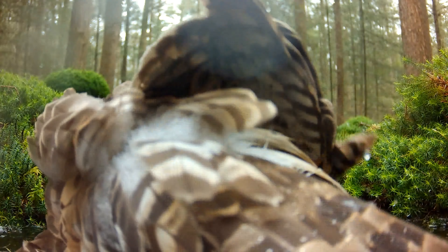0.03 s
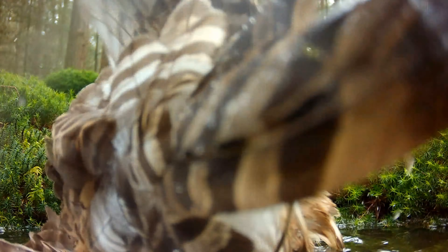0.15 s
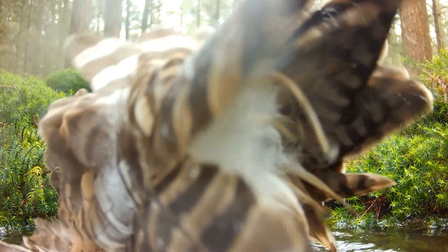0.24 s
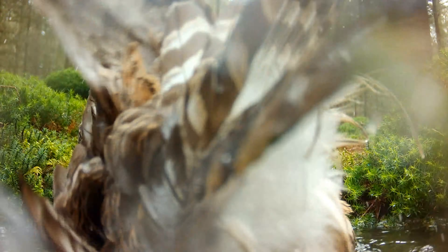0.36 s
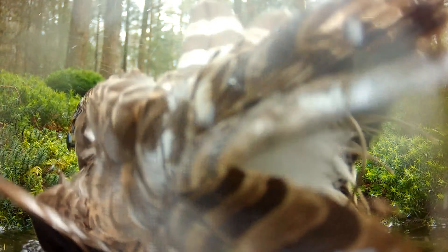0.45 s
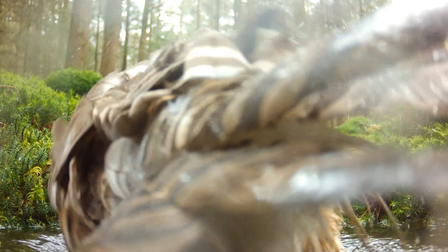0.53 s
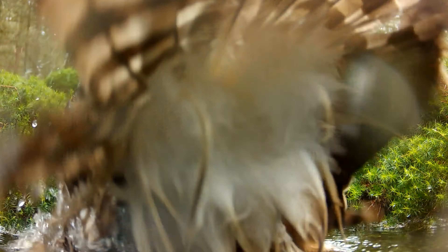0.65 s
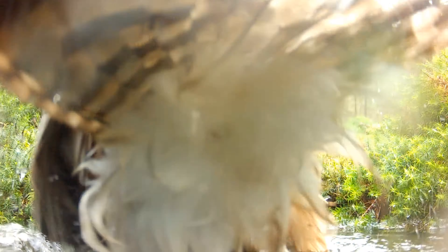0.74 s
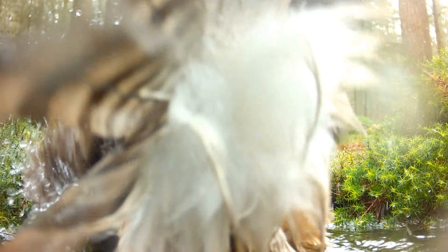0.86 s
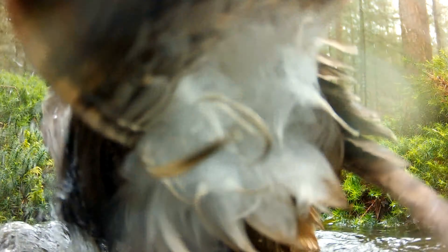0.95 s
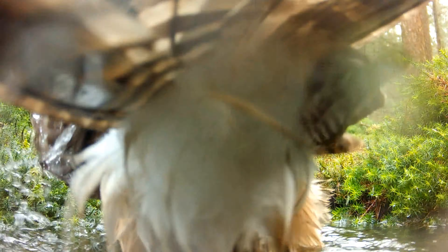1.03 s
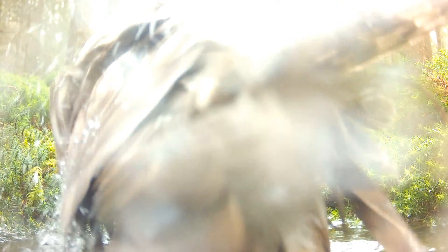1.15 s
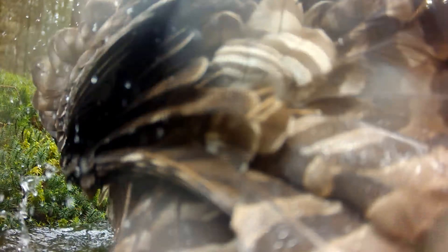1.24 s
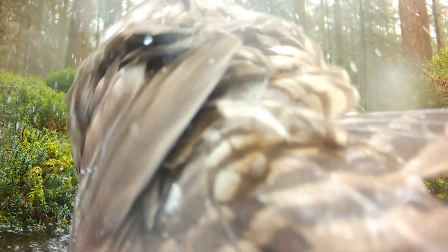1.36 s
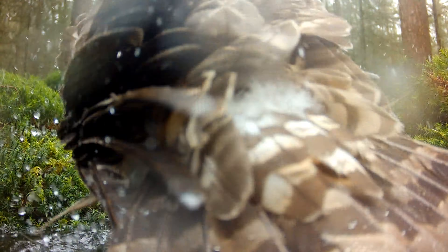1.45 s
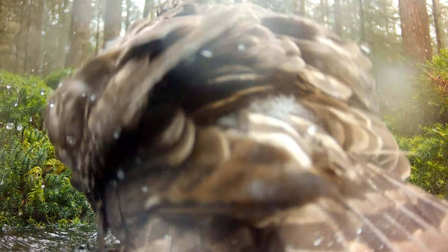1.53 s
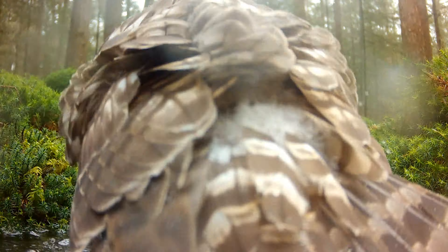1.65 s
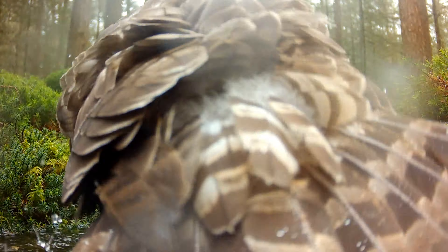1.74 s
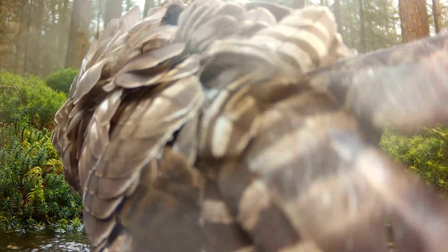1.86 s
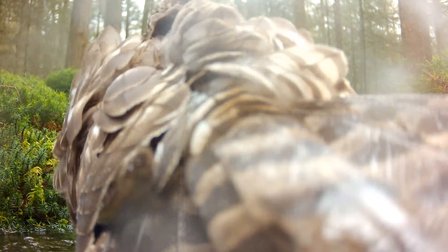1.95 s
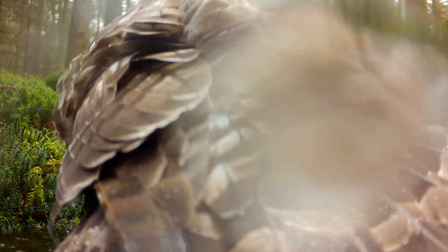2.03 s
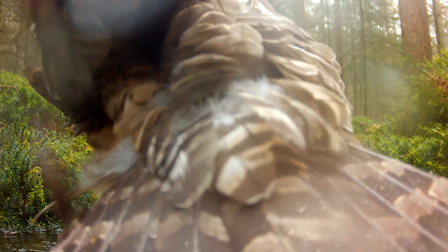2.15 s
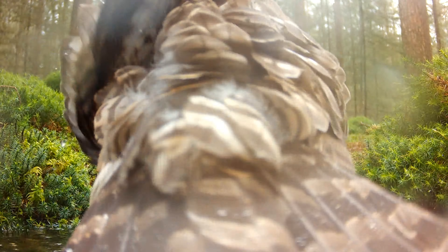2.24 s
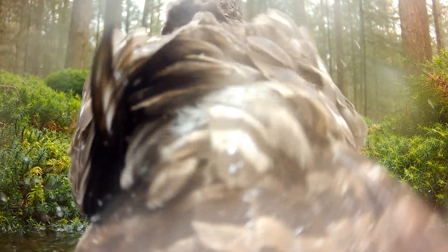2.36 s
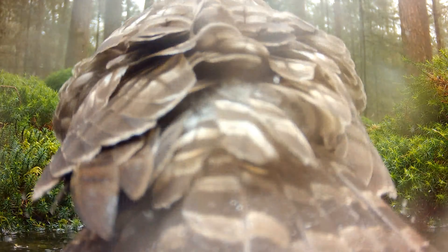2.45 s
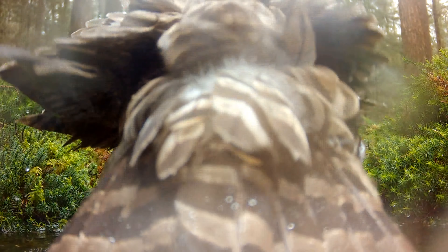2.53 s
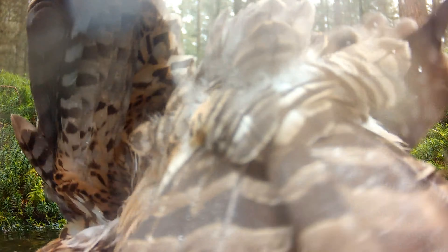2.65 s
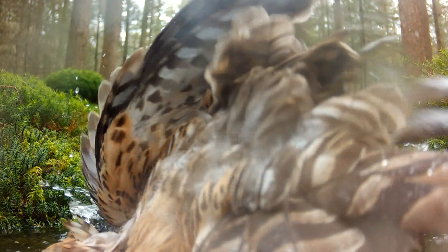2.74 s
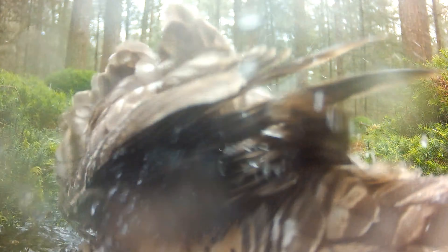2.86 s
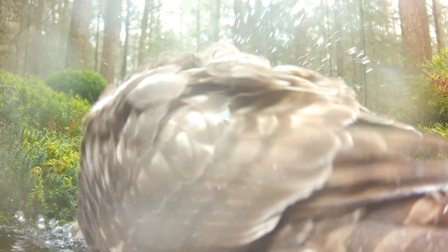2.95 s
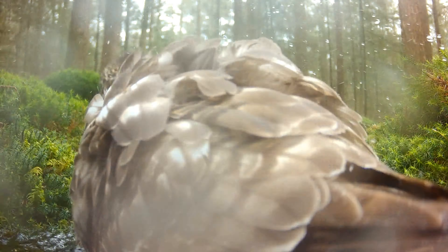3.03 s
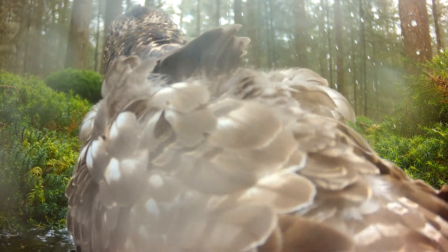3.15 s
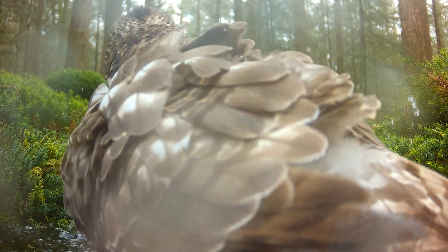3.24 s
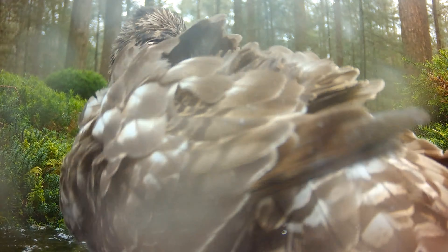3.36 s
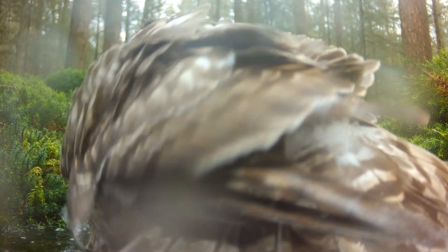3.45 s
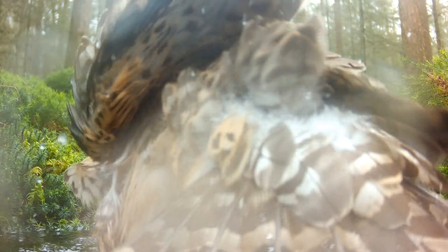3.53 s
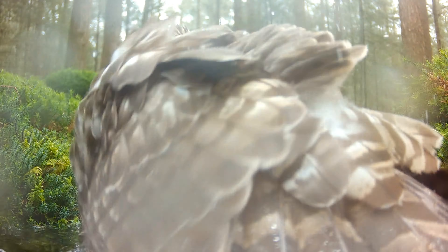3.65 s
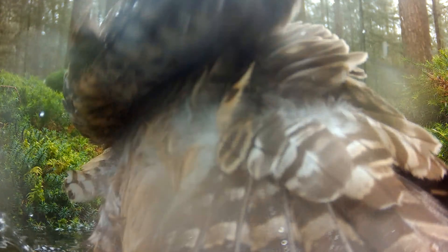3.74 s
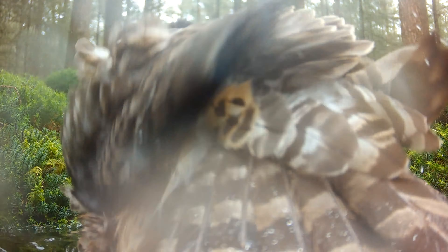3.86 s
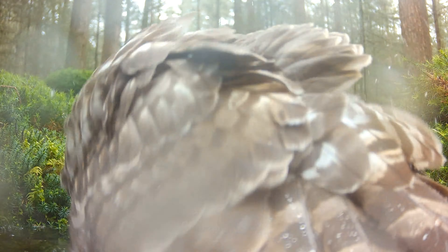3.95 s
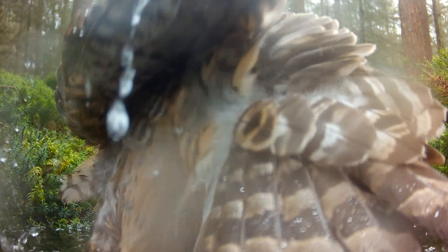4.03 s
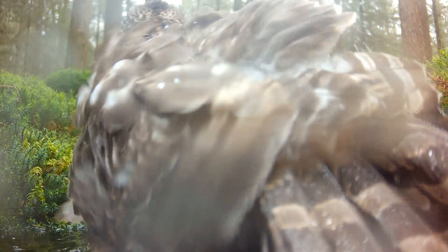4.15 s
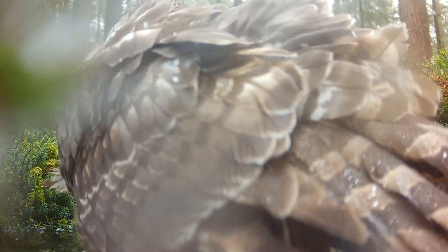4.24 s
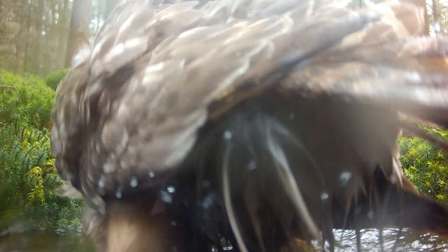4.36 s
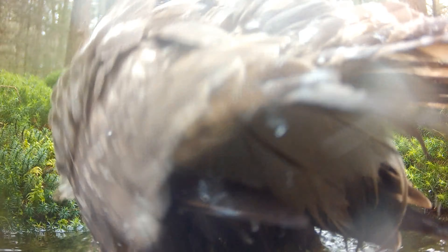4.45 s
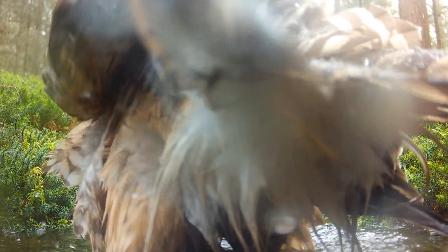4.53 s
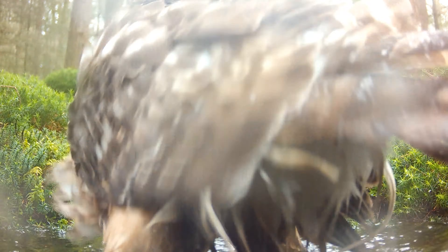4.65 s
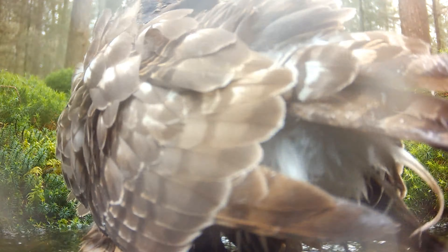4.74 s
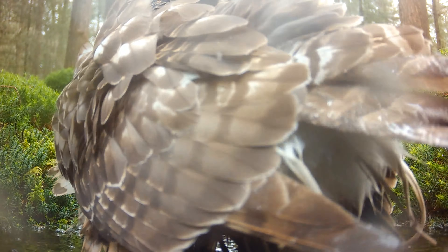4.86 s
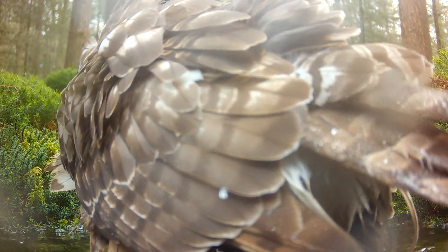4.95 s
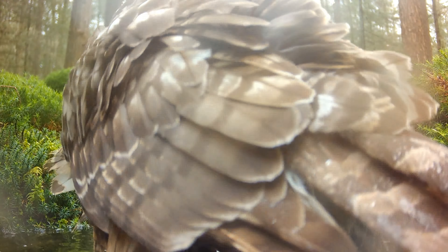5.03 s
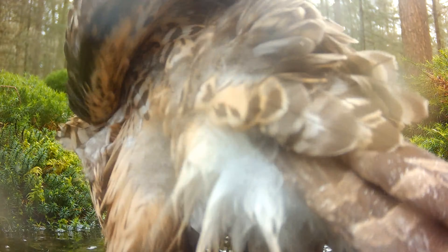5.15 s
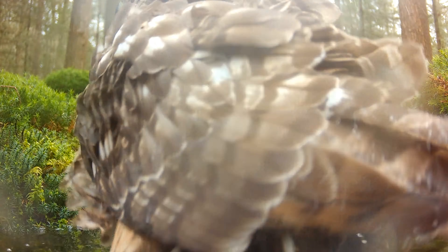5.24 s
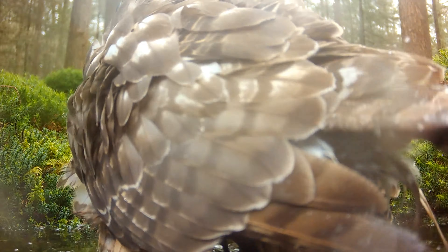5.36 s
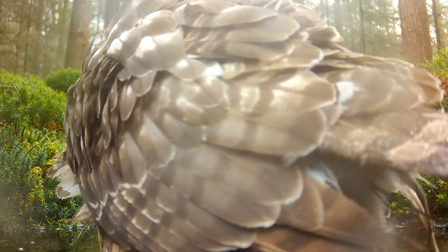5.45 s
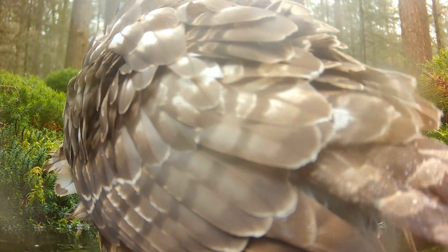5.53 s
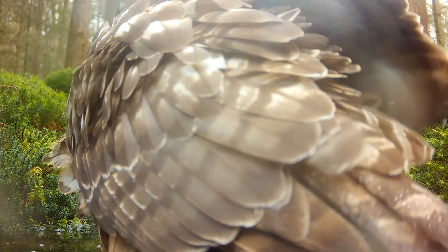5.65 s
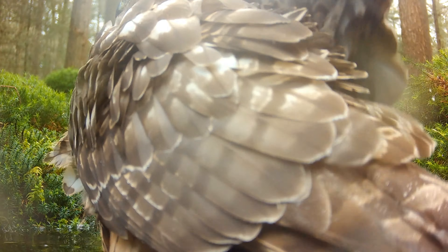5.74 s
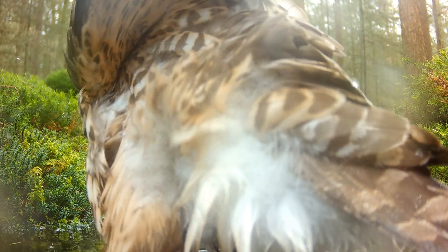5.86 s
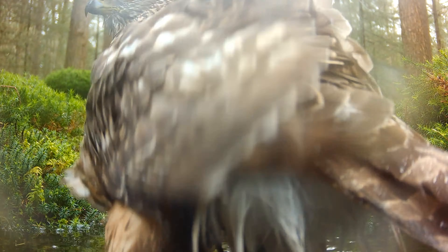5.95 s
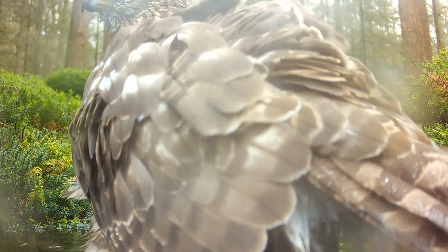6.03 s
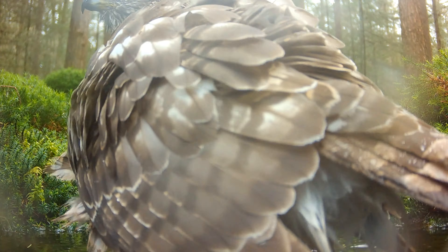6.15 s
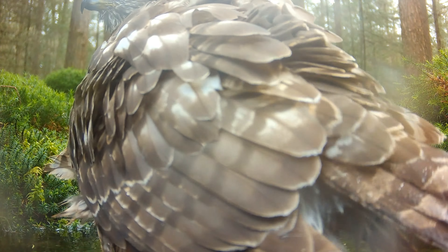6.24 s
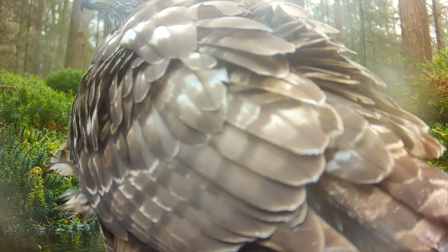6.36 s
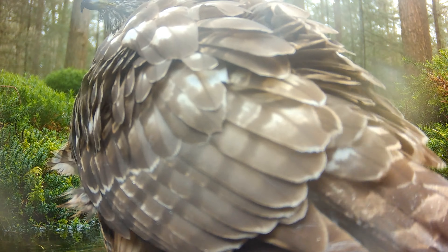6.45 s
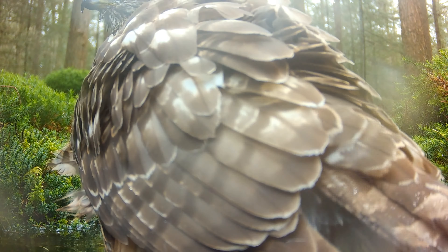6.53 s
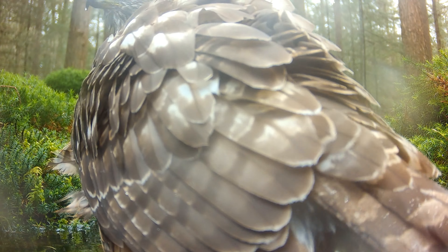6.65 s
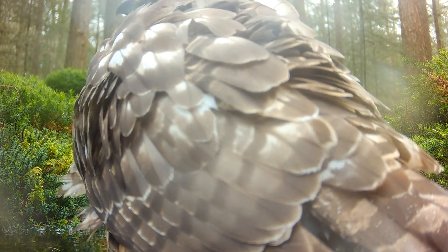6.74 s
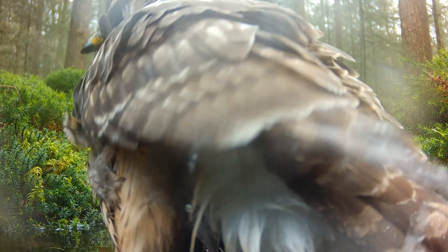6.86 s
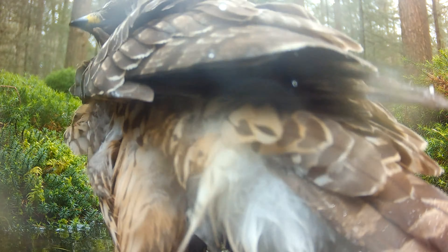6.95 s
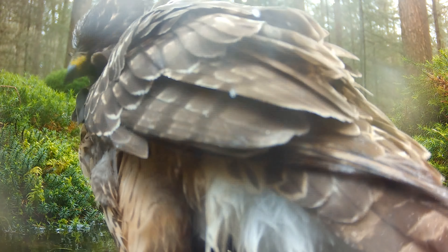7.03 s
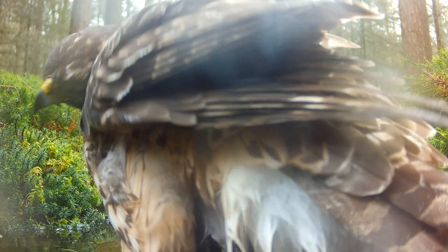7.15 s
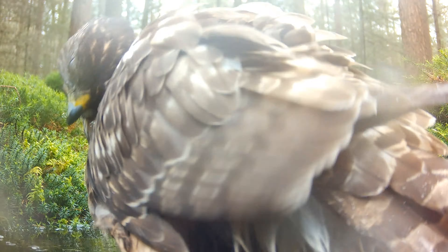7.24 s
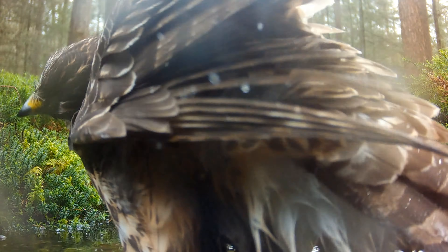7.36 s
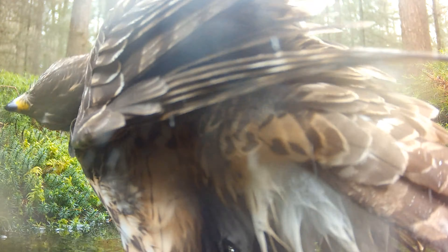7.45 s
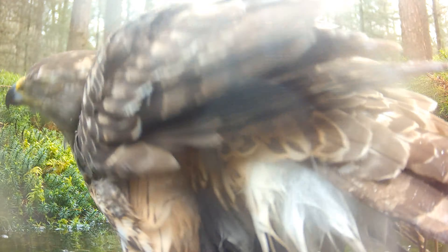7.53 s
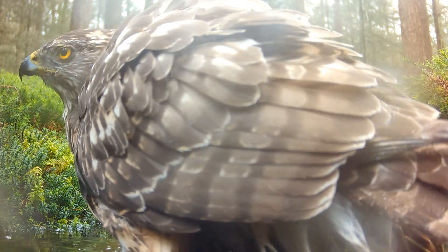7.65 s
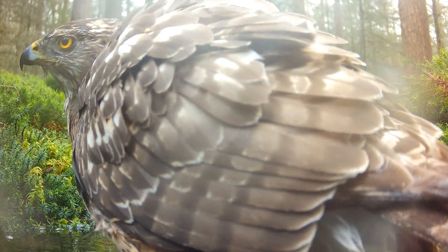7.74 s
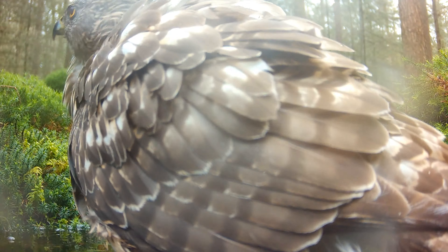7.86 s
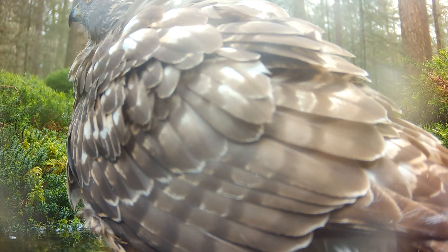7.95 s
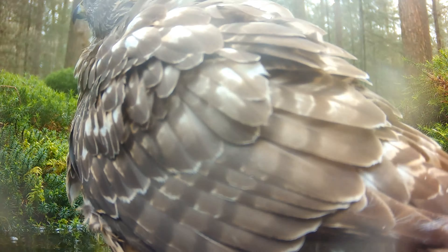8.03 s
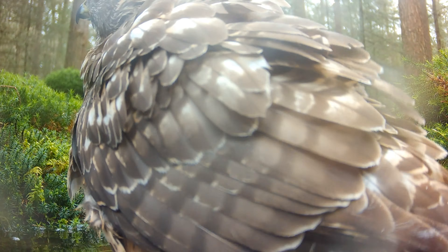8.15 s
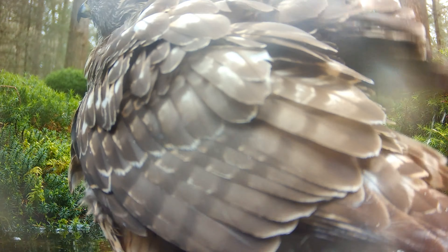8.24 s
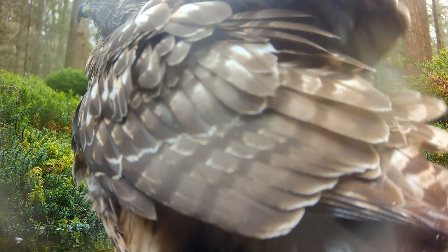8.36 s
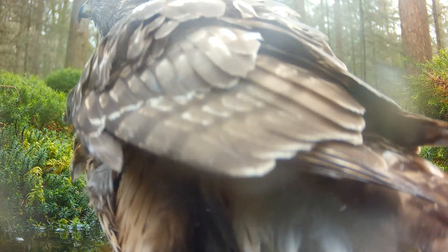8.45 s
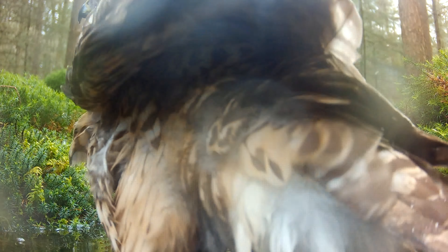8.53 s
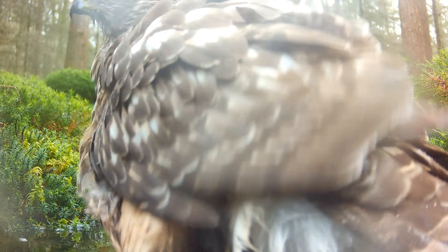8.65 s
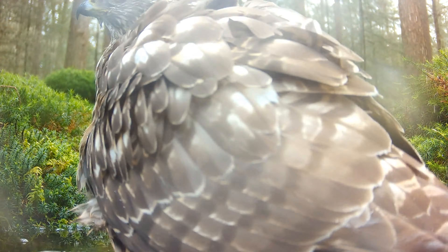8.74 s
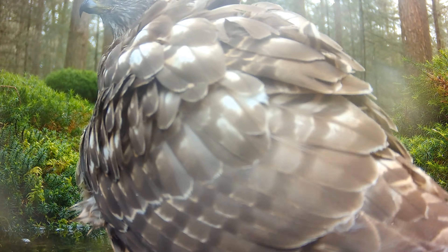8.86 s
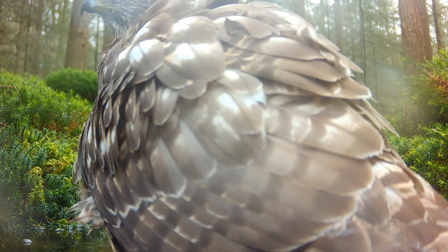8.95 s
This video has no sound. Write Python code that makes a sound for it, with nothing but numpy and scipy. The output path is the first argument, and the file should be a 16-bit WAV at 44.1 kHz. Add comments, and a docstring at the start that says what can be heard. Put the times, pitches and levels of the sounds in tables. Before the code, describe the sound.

A hawk bathes in a shallow forest pool right beside the microphone. From 0.1 to 1.4 s wet wings slap and sweep the water in a rapid, irregular bout: sharp cracks, crackling spray, ringing bubbles and drops falling back. It eases to light flicks and dripping, then a short cluster at 2.2-2.5 s. Around 2.7-3.1 s the body dips, with low gurgling plops and a slap. Distant rising bird whistles sound at about 2.3, 2.9 and 3.6 s. Softer sweeps and drips follow, a hard double slap at 4.7 s, quick slaps at 5.2-5.5 s, a bubbly splash at 5.7-5.9 s and one slap at 6.0 s. Thin bird notes come and go from 5.5 s. From 6.3 to 8.3 s it is quiet: faint trickle, soft feather brushes, low forest air, whistles from 8.0 s. A bright splashing burst at 8.3-8.7 s fades to calm.

```python
"""Hawk bathing in a forest pool

A hawk bathes in a shallow forest pool, right beside a single microphone.
Its wings sweep up spray (swelling droplet noise) and slap the water (sharp noise bursts) in bouts;
trapped air rings as bubbles (damped, rising sines) and drops patter back. Water trickles on behind it,
small birds whistle far off among the trees (gliding sines), and the forest air rushes low (coloured noise)."""
import sys
import numpy as np
from scipy import signal
from scipy.fft import rfft, irfft, next_fast_len
from scipy.io import wavfile
from scipy.ndimage import map_coordinates

SR = 44100
rng = np.random.default_rng(int(sys.argv[2]) if len(sys.argv) > 2 else 0)


def transcribe(signal):
    """Save signal, clipped to [-1, 1], as a 16-bit WAV file at the path in sys.argv[1]."""
    frames = np.atleast_2d(signal).T
    limited = np.clip(frames, -1, 1)
    pcm = np.round(limited * 32767).astype(np.int16)
    wavfile.write(sys.argv[1], SR, pcm)


N = 396900  # samples, 9 s


def amp(db):
    """Decibels to gain."""
    return 10 ** (np.asarray(db) / 20)


def unit(x):
    """Scale to rms 1."""
    return x / np.sqrt(np.mean(x ** 2) + 1e-20)


def along(points, hz):
    """Read (f/Hz, value) points on a log frequency axis."""
    f, v = np.transpose(points)
    return np.interp(np.log(hz + 1), np.log(f + 1), v)


def curves(rows):
    """One value per sample for each column after the time."""
    s, *cols = np.transpose(rows)
    return [np.interp(np.arange(N) / SR, s, c) for c in cols]


def wobble(rate, size):
    """A smooth random curve, rate knots a second."""
    knots = rng.standard_normal(int(size * rate / SR) + 4)
    return map_coordinates(knots, [np.arange(size) * rate / SR])


def filtered(x, response):
    """Multiply the spectrum of x by a response of frequency."""
    n = x.shape[-1]
    m = next_fast_len(n + 2048)  # room for the filter to ring out
    return irfft(rfft(x, m) * response(np.fft.rfftfreq(m, 1 / SR)), m)[..., :n]


def coloured(x, spectrum):
    """Filter x by a table of f/Hz, level/dB, at rms 1."""
    return unit(filtered(x, lambda hz: amp(along(spectrum, hz))))


def add(track, s, sound):
    """Mix a sound in at a time in seconds."""
    i = round(s * SR)
    sound, i = sound[max(-i, 0):], max(i, 0)
    track[i:i + len(sound)] += sound[:len(track) - i]


def echo(x, decay, size=SR):
    """A diffuse answer from around: a noise tail in which each frequency dies at its own speed."""
    hz, t, z = signal.stft(rng.standard_normal(size), SR, nperseg=256)
    fading = z * amp(-60 * t / along(decay, hz)[:, None])
    tail = signal.istft(fading, SR, nperseg=256)[1]
    return signal.fftconvolve(x, tail / np.linalg.norm(tail))[:N]


def droplets(rate, pitch_hz, spread, cycles, scatter_db, size=500):
    """A patter of tiny bubbles, each a damped sine that rises a little; rms 1."""
    when, pitch, strength = rng.random((int(rate * N / SR), 3)).T
    hz = np.clip(pitch_hz * (pitch / (1 - pitch)) ** spread, 400, SR / 3)[:, None]
    age = hz * np.arange(size) / SR / cycles  # in decay times
    rings = np.sin(2 * np.pi * cycles * age * (1 + 0.034 * age)) * np.exp(-age)
    rings *= amp(-scatter_db * np.log(strength + .03))[:, None]  # a few stand out
    at = (when * N).astype(int)[:, None] + np.arange(size)
    return unit(np.bincount(at.ravel(), rings.ravel(), N)[:N])


def pocket(t, pitch, swell, t60):
    """One ringing bubble, its envelope peaking at 1; the moving surface shakes its loudness and pitch."""
    shape = (1 - np.exp(-(t / swell) ** 2)) * amp(-60 * t / t60)
    unrest = 1 - np.exp(-t / 0.0059)
    shake = amp(5.2 * unrest * wobble(266, size=len(t)))
    phase = np.cumsum(pitch * (1 + 0.022 * unrest * wobble(680, size=len(t)))) / SR
    return shape / shape.max() * shake * np.sin(2 * np.pi * phase)


# drift of the forest air, before trims: t/s, low rush level/dB, higher murmur level/dB
AIR_DRIFT = [(0.0, -78.5, -68), (0.77, -68, -64), (1.0, -70, -80), (1.33, -64, -70), (1.48, -68.5, -74.5),
             (2.48, -75.5, -75), (2.93, -73, -69), (3.06, -76, -73), (3.41, -78.5, -81),
             (4.49, -74.5, -69.5), (5.01, -76.5, -75), (5.44, -70.5, -68), (5.79, -66, -64),
             (6.57, -75.5, -79), (8.32, -75.5, -70), (9.0, -75, -75)]
# colour of the low rush: f/Hz, relative level/dB per Hz
LOW_AIR_COLOUR = [(20, -8), (60, -5.5), (110, -3), (160, 0), (210, -5.5), (300, -11), (600, -41)]
# colour of the higher murmur: f/Hz, relative level/dB per Hz
HIGHER_AIR_COLOUR = [(150, -27.5), (250, -1.5), (330, 5), (420, -7), (600, 3), (900, -40.5)]


def air(low_db=2, higher_db=1.0):
    """The low rush of the forest: two bands of noise drift separately, so its colour moves."""
    low, higher = curves(AIR_DRIFT)
    rush = amp(low + low_db) * coloured(rng.standard_normal(N), LOW_AIR_COLOUR)
    rush += amp(higher + higher_db) * coloured(rng.standard_normal(N), HIGHER_AIR_COLOUR)
    return amp(wobble(2.3, size=N)) * rush


# one rising whistle, far off: t/s from its start at slowness 1, f/Hz, relative level/dB
WHISTLE_SHAPE = [(0, 2390, -2), (0.06, 2514, 1), (.17, 2745, 5.5), (0.231, 3048, 2.5), (0.272, 3200, 11),
                 (.31, 3240, 5.5), (.34, 3380, -24)]
# its calls: t/s, slowness (stretch of the time), level/dB before the direct and echo trims
WHISTLE_CALLS = [(2.28, 1.03, -56.5), (2.92, 1.03, -56.5), (3.561, 1.1, -58), (8.02, 1.2, -59.5),
                 (8.659, 1.02, -57.5)]
# thin notes of a second songbird: t/s, length/s, start f/Hz, end f/Hz, level/dB before the trims
THIN_NOTES = [(5.52, 0.065, 6200, 5460, -78), (5.585, 0.024, 4600, 4200, -61),
              (5.70, 0.028, 4500, 4640, -59), (6.0, 0.05, 4630, 4480, -62), (6.14, 0.071, 4480, 4340, -71),
              (6.42, 0.17, 5350, 5200, -84), (6.44, 0.1, 3940, 3800, -78), (6.58, .14, 7450, 7300, -94),
              (7.123, 0.17, 7900, 7670, -82), (7.814, 0.086, 4470, 4280, -71.5),
              (8.025, 0.13, 5100, 4960, -78)]
# dying away among the trees: f/Hz, t60/s
TREE_DECAY = [(200, 0.26), (3000, 0.96), (10000, 0.6)]


def songbirds(direct_db=-2, echo_db=-3, quaver_db=4):
    """Far whistles, gliding sines, arrive wavering and trail off among the trunks."""
    out = np.zeros(N)
    at, hz, db = np.transpose(WHISTLE_SHAPE)
    for s, slowness, level in WHISTLE_CALLS:
        t = np.arange(int(at[-1] * slowness * SR)) / SR / slowness
        pitch = np.interp(t, at, hz) * (1 + 0.0079 * wobble(39.2, size=SR)[:len(t)])
        level = level + 2 * wobble(27.6, size=SR)[:len(t)]  # the voice wavers in strength
        voice = np.sin(2 * np.pi * np.cumsum(pitch) / SR)
        add(out, s, amp(level + np.interp(t, at, db)) * signal.windows.tukey(len(t), .1) * voice)
    for s, length, start_hz, end_hz, level in THIN_NOTES:
        pitch = np.linspace(start_hz, end_hz, int(length * SR))
        level = level + quaver_db * wobble(55, size=len(pitch))
        voice = np.sin(2 * np.pi * np.cumsum(pitch) / SR)
        add(out, s, amp(level) * np.hanning(len(pitch)) * voice)
    return amp(direct_db) * out + amp(echo_db) * echo(out, TREE_DECAY)


DUNK_S, DUNK_WIDTH_S, DUNK_DB = 2.824, 0.17, -47.5  # the body dips in once: time, width, stirring


def dunk():
    """How deep the body is in the water, 0 to 1."""
    return np.exp(-((np.arange(N) / SR - DUNK_S) / DUNK_WIDTH_S) ** 2)


WAKE_DB, WAKE_RISE_S, WAKE_FALL_S = -13, 0.012, 0.027  # wake of a sweep: against its splash, build-up, fall
SLAP_WAKE_DB, SLAP_WAKE_S = -29, 0.027  # a slap leaves a smaller, shorter wake
# the restless pool, before its trim and wobble: t/s, level/dB
POOL_LEVEL = [(0.0, -58.5), (0.12, -54.5), (0.58, -48.5), (1.3, -49.5), (1.65, -54.5), (2.2, -58),
              (2.38, -52.5), (2.66, -62.5), (2.91, -44.5), (3.18, -57), (4.61, -55.5), (4.76, -67),
              (5.11, -61.5), (5.31, -50.5), (5.46, -65), (5.69, -56.5), (5.86, -57), (6.02, -61),
              (6.31, -67.5), (6.82, -62.5), (8.05, -69), (8.52, -56.5), (8.85, -65), (9.0, -65.5)]


def stirring(pool_db=-.5, restless_db=1.65):
    """How hard the water is stirred, in dB: powers of restless pool, dunk and the wake of every stroke."""
    trickle_db, = curves(POOL_LEVEL)
    power = amp(trickle_db + pool_db + restless_db * wobble(4, size=N)) ** 2
    power += (amp(DUNK_DB) * dunk()) ** 2
    t = np.arange(-SR // 5, SR // 2) / SR
    wake = np.exp(-np.maximum(-t / WAKE_RISE_S, t / WAKE_FALL_S))
    for s, db, *_ in WING_SWEEPS:
        add(power, s + t[0], (amp(db + WAKE_DB) * wake) ** 2)
    slap_wake = np.exp(-t[t >= 0] / SLAP_WAKE_S)
    for s, db, *_ in WING_SLAPS:
        add(power, s, (amp(db + SLAP_WAKE_DB) * slap_wake) ** 2)
    return 10 * np.log10(power)


DRIP_DB, DRIP_GROWS, CALM_DB = -86, 1.415, -69  # drips over a calm pool, dB per dB of stirring, that calm
# colour of sloshing water: f/Hz, relative level/dB per Hz
SLOSH_COLOUR = [(180, -29), (300, -6.5), (385, -6), (838, -1.5), (1130, -3.5), (1280, -6), (1510, 1),
                (1920, 3), (2150, -3.5), (2620, 0), (3590, -8.5), (3920, -12.5), (4120, -10.5), (4730, -16),
                (6000, -24.5), (7800, -24), (13200, -120)]
# colour of fine dripping: f/Hz, relative level/dB per Hz
DRIP_COLOUR = [(2000, -9), (3500, -0.5), (4600, -2), (6000, -7.5), (9000, -10), (11500, -18),
               (16000, -29.5)]


def churn(surge_db=5.0):
    """Stirred water sloshes and feathers drip; harder stirring makes separate bubbles stand out."""
    stir_db = stirring()
    wet_db = DRIP_DB + DRIP_GROWS * (stir_db - CALM_DB)
    share = np.clip((stir_db + 70) / 32, .1, .85)  # power share of the separate bubbles
    fizz = droplets(rate=900, pitch_hz=1750, spread=.3, cycles=7, scatter_db=3.5)
    slosh = np.sqrt(share) * coloured(fizz, SLOSH_COLOUR)
    slosh += np.sqrt(1 - share) * coloured(rng.standard_normal(N), SLOSH_COLOUR)
    ticks = droplets(rate=70, pitch_hz=7000, spread=.3, cycles=3, scatter_db=6)
    drips = coloured(.5 * ticks + rng.standard_normal(N), DRIP_COLOUR)
    surge = amp(surge_db * share * wobble(68, size=N))
    return surge * (amp(stir_db) * slosh + amp(wet_db) * drips)


# small drops tick down close by: t/s, starting f/Hz, level/dB
SMALL_DROPS = [(1.928, 4560, -31.5), (2.053, 4700, -46), (3.729, 8020, -49), (4.278, 7040, -52),
               (4.349, 3760, -33), (4.727, 4460, -40), (4.954, 3970, -60), (5.653, 5970, -43.5),
               (5.659, 3870, -40), (5.683, 5040, -23.5), (6.113, 6200, -50), (6.372, 7330, -60),
               (7.217, 8900, -51.5), (7.559, 7460, -52.5), (8.341, 4160, -36), (8.593, 4370, -42)]


def drops(t60=0.013, tick_db=-11, tick_t60=0.0075):
    """A drop ticks on the surface (noise) and traps a tiny bubble (a rising ring)."""
    out, t = np.zeros(N), np.arange(SR // 25) / SR
    for s, hz, db in SMALL_DROPS:
        tick = amp(tick_db - 60 * t / tick_t60) * coloured(rng.standard_normal(len(t)), DRIP_COLOUR)
        ring = 0.98 * pocket(t, hz * (1 + 5 * t), 0.000088, t60)
        add(out, s, amp(db) * (tick + ring))
    return out


def gurgle(level_db=-46):
    """Air squeezed out of the dunked plumage comes up as a string of low, rising plops."""
    plops = droplets(rate=160, pitch_hz=1400, spread=.2, cycles=7, scatter_db=3.5, size=1200)
    return amp(level_db) * dunk() * plops


# colour of a splash: f/Hz, relative level/dB per Hz
SPLASH_COLOUR = [(25, -16), (150, -18), (320, -11.5), (480, -5), (800, 2), (980, -6.5), (1250, -9),
                 (1600, 1), (2350, -1), (3100, -7), (5000, -12.5), (6000, -17.5), (8800, -21),
                 (16000, -41.5)]
SWELL_CYCLES = 1.8  # a bubble takes this many cycles to start ringing
# air pockets ring: t/s, starting f/Hz, level/dB, t60/s, initial rise/octaves per 10 ms
AIR_POCKETS = [(.374, 2200, -29.5, 0.037, 0.048), (.411, 2940, -27.5, 0.029, .046),
               (0.505, 2270, -21.5, 0.063, 0.03), (0.5418, 1990, -21, 0.037, .019),
               (0.657, 3290, -22.5, .017, .05), (0.796, 3580, -24.5, 0.021, 0.026),
               (.884, 3780, -27.5, 0.017, .04), (0.9, 2470, -30, 0.035, .028),
               (.953, 3720, -31, 0.018, 0.044), (1.004, 1780, -18.5, 0.031, 0.022),
               (1.015, 1050, -36, 0.061, 0.071), (1.015, 3120, -26, 0.013, .21),
               (1.389, 1420, -30, 0.03, .08), (1.42, 2000, -29.5, 0.044, 0.035),
               (1.43, 2750, -31, 0.02, .045), (1.473, 2860, -38, .03, .06), (1.535, 2500, -40, 0.046, .05),
               (1.928, 3870, -33.5, 0.017, .035), (2.391, 850, -27.5, 0.08, 0.048),
               (2.397, 2290, -25, 0.031, 0.091), (2.684, 1440, -19.5, 0.0078, 0.11),
               (2.691, 1620, -22.5, 0.01, 0.23), (2.757, 1150, -29.5, 0.021, .1),
               (2.799, 1460, -27.5, 0.03, .05), (2.883, 1240, -23.5, 0.019, 0.09),
               (2.896, 897, -35, 0.053, .063), (2.91, 1130, -30.5, 0.046, 0.064),
               (2.988, 1720, -34, .073, 0.015), (3.0155, 1566, -14, .042, 0.21),
               (3.027, 2100, -27, 0.032, .14), (3.207, 808, -35.5, 0.085, 0.04),
               (4.084, 2500, -38, 0.028, .13), (4.311, 2890, -40, 0.028, 0.036),
               (4.343, 1950, -28.5, 0.031, 0.05), (4.759, 1810, -43, 0.019, 0.066),
               (5.289, 3180, -33.5, .028, .03), (5.683, 2450, -14.5, 0.014, 0.19),
               (5.75, 2690, -13, 0.016, .05), (5.755, 1610, -20.5, 0.018, .035),
               (5.763, 1465, -24, 0.088, 0.091), (5.782, 1210, -23.5, 0.011, .13),
               (5.857, 1400, -31, 0.039, .041), (6.02, 2280, -36, 0.023, 0.051),
               (8.3362, 2020, -21.5, 0.019, 0.07), (8.375, 960, -29, 0.079, 0.034),
               (8.431, 3380, -21.5, 0.015, .23), (8.433, 818, -26.5, 0.1, 0.011),
               (8.463, 1530, -16, 0.03, 0.11), (8.494, 2160, -8.5, 0.027, 0.44),
               (8.502, 3250, -25.5, 0.043, .009), (8.522, 1726, -17, 0.035, .025),
               (8.633, 3380, -28, 0.029, .03)]


def bubbles(glide_s=0.028, pinch_db=-19, pinch_t60=0.015):
    """Air pockets pinch off with a tiny crack, ring, and climb in pitch as they near the surface."""
    out, t = np.zeros(N), np.arange(SR // 8) / SR
    for s, hz, db, t60, rise in AIR_POCKETS:
        swell = SWELL_CYCLES / hz
        octaves = rise * glide_s / 10 ** -2 * (1 - np.exp(-t / glide_s))
        pitch = hz * 2 ** octaves
        crack = (1 - np.exp(-t / swell)) * amp(pinch_db - 60 * t / pinch_t60)
        crack *= coloured(rng.standard_normal(len(t)), SPLASH_COLOUR)
        add(out, s, amp(db) * (pocket(t, pitch, swell, t60) + crack))
    return out


def fallback(thrown, linger_s=0.043):
    """Thrown water comes down again as small ringing drops: the more spray, the louder."""
    memory = np.exp(-np.arange(SR // 3) / SR / linger_s)
    loudness = np.abs(signal.fftconvolve(np.abs(thrown), memory / memory.sum())[:N])
    plinks = droplets(rate=80, pitch_hz=3000, spread=.25, cycles=12, scatter_db=4.5, size=1000)
    return amp(-7) * loudness * plinks


USUAL_DB = -30  # a stroke of ordinary force
# light strokes throw relatively more fine spray, and so do strong thumps (dB, dB per dB, dB per dB)
SPATTER_DB, SPATTER_PER_FORCE, SPATTER_PER_THUMP = -3, -0.24, .28


def band_levels(db, thump_db, hollow_db):
    """Thump, hollow, splash and spatter of one stroke in dB; spatter follows from force and shove."""
    spatter_db = SPATTER_DB + SPATTER_PER_FORCE * (db - USUAL_DB) + SPATTER_PER_THUMP * thump_db
    return db + np.array([thump_db, hollow_db, 0, spatter_db])


# thump, hollow, splash and spatter bands of a stroke: low edge f/Hz, high edge f/Hz
STROKE_BANDS = [(20, 250), (250, 1200), (1200, 3500), (3500, 16000)]


def splash(burst, push, shape, levels_db):
    """A push makes the thump, a burst of water noise the hollow, splash and spatter."""
    out = 0
    for source, (lo, hi), db in zip([push, burst, burst, burst], STROKE_BANDS, levels_db):
        edges = lambda hz: 1 / np.sqrt((1 + (lo / (hz + 1)) ** 10) * (1 + (hz / hi) ** 10))
        part = filtered(source, lambda hz: amp(along(SPLASH_COLOUR, hz)) * edges(hz))
        # same energy as the shape, so that the level holds at the crest
        out = out + amp(db) * part * np.linalg.norm(shape) / np.linalg.norm(part)
    return out


COLLAPSE = 0.91  # fall time of the sheet of spray as a multiple of its swell time
SWEEP_THUMP_DB, THUMP_PER_HOLLOW = -20, 0.45  # a deep sweep also shoves more air (dB, dB per dB)
# a wing or the tail sweeps the water, or wet feathers brush softly, right by the microphone:
# t/s of the crest, splash level/dB, hollow level/dB relative to it, swell/s
WING_SWEEPS = [(0.209, -47, -1, 0.0094), (0.247, -37, -2.5, 0.01), (.469, -30, -7, 0.019),
               (.677, -25, -11, 0.01), (.714, -27, -12, 0.011), (.765, -39, -6, 0.032),
               (.895, -34, -5.5, .016), (.921, -29.5, -17, 0.012), (.943, -34.5, -8, 0.018),
               (1.152, -38, -6, 0.027), (1.262, -36, -16, 0.011), (1.352, -37, -4, 0.058),
               (2.171, -51.5, -3.5, 0.015), (2.338, -37, -18, 0.004), (2.403, -32.5, -22, 0.023),
               (2.472, -35.5, -21, 0.012), (2.832, -40, -3.5, 0.029), (2.885, -40.5, -36, 0.015),
               (3.66, -38, -8, 0.02), (3.927, -42, -3, 0.023), (4.202, -35, -9.5, 0.019),
               (5.2, -54, -19, .045), (5.274, -46, -9, 0.03), (5.831, -37.5, -13, 0.0099),
               (5.88, -45.5, -23, 0.061), (6.89, -63.5, -4, 0.04), (7.08, -70.5, -3, 0.054),
               (7.74, -71, -6, 0.041), (7.31, -56, -3.5, 0.027), (8.438, -32, -25, 0.012),
               (8.477, -32, -41, 0.031), (8.552, -38, -25, 0.032), (8.709, -47.5, -8, 0.024)]


def sweeps(flutter_db=3.5):
    """A wing drags a sheet of crackling spray, droplets and noise, that swells and collapses."""
    out, t = np.zeros(N), np.arange(-SR // 8, SR // 6) / SR
    spray = droplets(rate=3000, pitch_hz=2900, spread=.55, cycles=2.2, scatter_db=4)
    spray += .4 * rng.standard_normal(N)
    spray *= amp(flutter_db * wobble(220, size=N))  # feather after feather leaves the water
    for s, db, hollow, swell in WING_SWEEPS:
        shape = np.exp(-np.maximum(-t, t / COLLAPSE) / swell) * signal.windows.tukey(len(t))
        burst = shape * spray[rng.integers(N - len(t)):][:len(t)]
        push = shape * rng.standard_normal(len(t))
        levels = band_levels(db, SWEEP_THUMP_DB + THUMP_PER_HOLLOW * hollow, hollow)
        add(out, s + t[0], splash(burst, push, shape, levels))
    return out


TOUCH_S = .0045  # feather tips touch the water about this long before the blow
# wet feathers slap the water, right by the microphone:
# t/s of the crest, splash level/dB, thump level/dB and hollow level/dB relative to it, t60/s
WING_SLAPS = [(.112, -28, -27, 1.5, 0.011), (.1969, -33, -18, -8, 0.022), (0.2441, -25.5, -28, -4.5, 0.019),
              (.2471, -28.5, -10, -14, 0.012), (0.3066, -40, -37, -24, 0.022),
              (0.3885, -29.5, -31, -10.5, 0.01), (.4725, -22.5, -18, -6.5, 0.014),
              (0.6834, -22.5, -10, -11, 0.016), (.7111, -22, -23, -5, 0.016),
              (.7349, -22, -35, -24, 0.0051), (0.7888, -28, -8.5, 6.5, 0.0045),
              (0.9184, -26.5, -22, 1, 0.0088), (.9772, -35.5, -21, 9, .005),
              (1.133, -24.5, -25, -3.5, 0.024), (1.2391, -20.5, -33.5, -3, 0.028),
              (1.3423, -26.5, -19, 1.5, 0.0061), (1.3512, -25, -15.5, -0.5, 0.024),
              (1.3918, -35.5, -40, -18, .02), (1.4197, -30.5, -28, -12, 0.014),
              (1.5599, -45, -17, -9, 0.015), (1.6078, -42.5, -33, -38, 0.016),
              (1.64, -40.5, -12, -5, 0.021), (2.1916, -52, 7, 5, 0.032), (2.2178, -34, -29, -6, 0.018),
              (2.3669, -24.5, -25, -11, 0.024), (2.3738, -27, -43, -12, .02),
              (2.39, -23.5, -44, -15, 0.0067), (2.4578, -38.5, -32, -7, 0.015),
              (2.4705, -32.5, -31, -22, 0.024), (2.6003, -44, -28, 5, 0.013), (2.6852, -40, -43.5, 4, .015),
              (2.7572, -42, -30, 7.5, .034), (2.8321, -37, -38.5, 0, 0.022),
              (3.0907, -31.5, -22, -9, 0.026), (3.5462, -40.5, -33, -5, 0.0095),
              (3.9301, -32.5, -17, -4, 0.032), (4.4103, -41, -32, -5, 0.013), (4.5971, -42, -20, -9, .013),
              (4.6808, -22.5, -24.5, -6, 0.022), (4.7061, -18, -15, -6, 0.0085),
              (5.16, -43.5, -13, -8.5, 0.032), (5.2225, -38.5, -33.5, -11, 0.011),
              (5.2638, -20.5, -22.5, -2.5, 0.014), (5.3001, -30.5, -31, -5.5, 0.0076),
              (5.3294, -23, -27, -7.5, 0.015), (5.3699, -31, -41, -7.5, 0.014),
              (5.4128, -36, -35, -6, 0.036), (5.4582, -39, -17, -17, 0.012), (5.6839, -26, -5, -6, 0.0045),
              (5.7371, -32, -23, -30, 0.035), (5.7517, -23.5, -39.5, -23, 0.0045),
              (5.7772, -38.5, -34.5, 3, 0.0099), (5.8561, -29, -27.5, -17, 0.015),
              (5.9853, -21, -13.5, 0.5, 0.015), (6.2148, -55, -12, -22, 0.01),
              (6.2772, -47, -34, -15, 0.029), (7.3072, -44, -17, 8.5, 0.012),
              (8.3739, -24, -13, -10.5, 0.018), (8.467, -19, -50, -31, 0.013),
              (8.5595, -28, -41, -26.5, 0.033), (8.5645, -31.5, -38, -27, .015),
              (8.6341, -35, -35, -25.5, 0.026), (8.703, -46, -27, 10.5, 0.016),
              (8.7252, -33, -49, -47, 0.017)]


def slaps(rise_s=0.00076, push_s=0.0002, wash_db=-21, wash_t60=0.061):
    """Each slap shoves the air once, cracks for a few milliseconds and leaves a short wash."""
    out, t = np.zeros(N), np.arange(-SR // 50, SR // 10) / SR
    before, age = np.minimum(t, 0), np.maximum(t, 0)
    for s, db, thump, hollow, t60 in WING_SLAPS:
        crack = np.exp(before / rise_s) * amp(-60 * age / t60)
        wash = np.exp(before / TOUCH_S) * amp(wash_db - 60 * age / wash_t60)  # feather tips touch first
        shape = crack + wash
        burst = shape * rng.standard_normal(len(t))
        push = np.exp(-(t / push_s) ** 2) + 1.2 * burst
        add(out, s + t[0], splash(burst, push, shape, band_levels(db, thump, hollow)))
    return out


# dying away between the banks: f/Hz, t60/s
BANK_DECAY = [(200, 0.042), (1800, 0.1), (10000, 0.048)]
# likeness of left and right, before the width factor: f/Hz, likeness (1 = same)
LEFT_RIGHT_LIKENESS = [(3000, 1), (5000, 1), (8000, 1), (13000, 0.88)]


def scene(banks_db=-18, trees_db=-33, width=0.73):
    """All lies in the centre; only the highest treble differs a little between left and right."""
    spray = sweeps()
    bath = slaps() + spray + fallback(spray) + bubbles() + gurgle() + drops()
    echoes = amp(banks_db) * echo(bath, BANK_DECAY) + amp(trees_db) * echo(bath, TREE_DECAY)
    mid = bath + echoes + churn() + songbirds() + air()
    side_gain = lambda hz: np.tan(np.arccos(np.clip(along(LEFT_RIGHT_LIKENESS, hz), 0, 1)) / 2)
    treble = filtered(mid, side_gain)
    side = width * treble * wobble(900, size=N)  # the difference varies at random
    return np.array([mid + side, mid - side])


TOP_HZ = 16100  # band limit


def record(dry):
    """Nothing is kept above the band limit."""
    return filtered(dry, lambda hz: hz < TOP_HZ)


dry = scene()
out = record(dry)
transcribe(out)
```